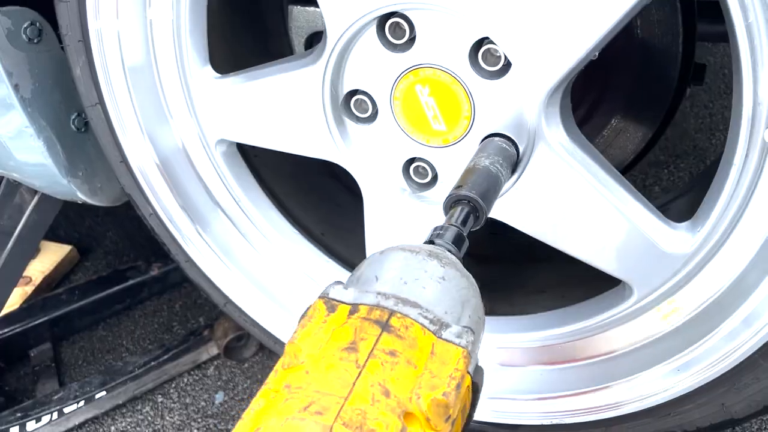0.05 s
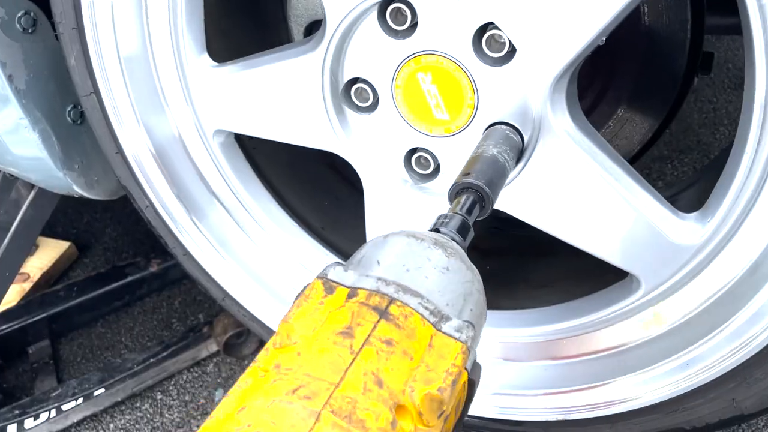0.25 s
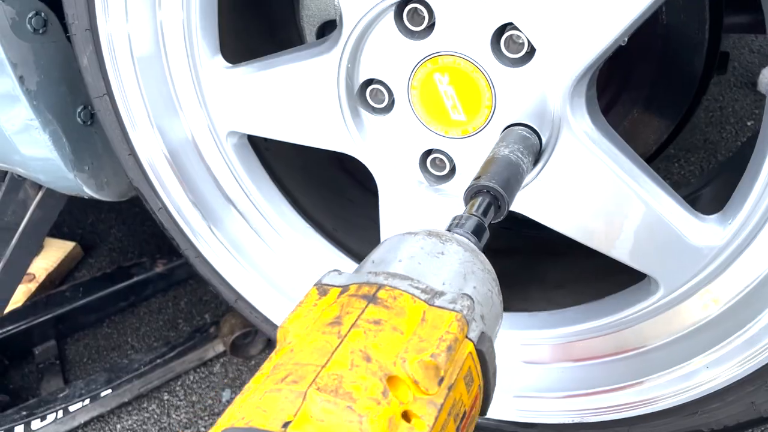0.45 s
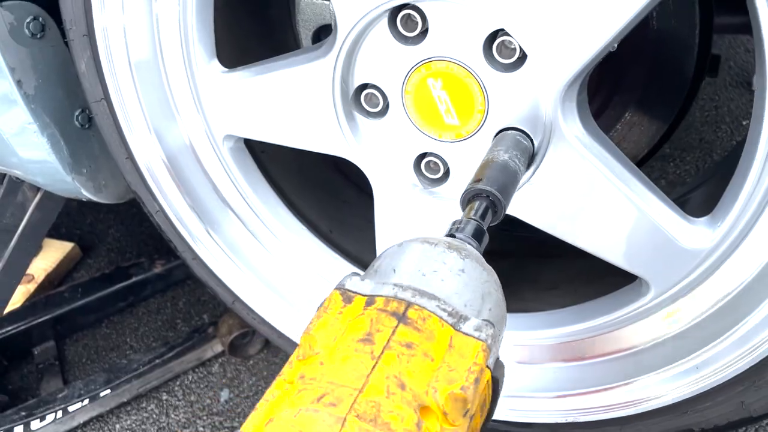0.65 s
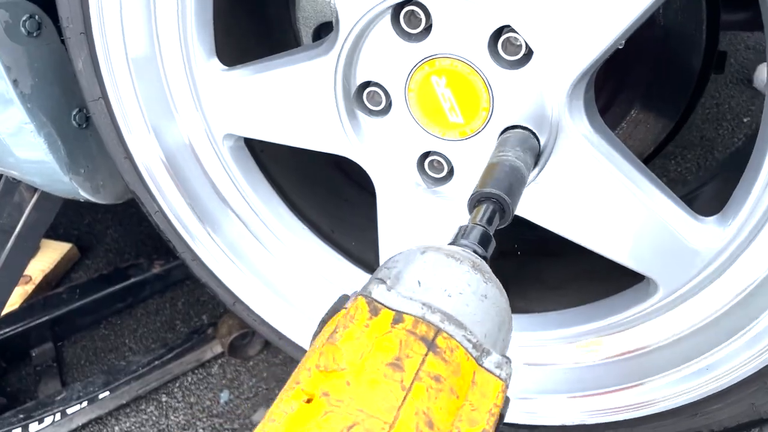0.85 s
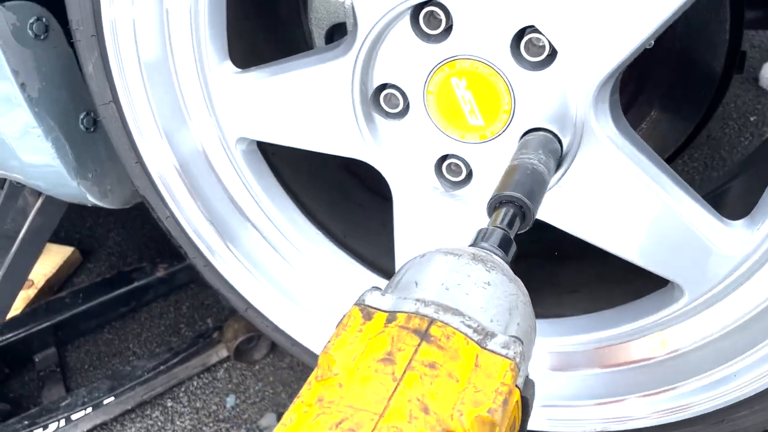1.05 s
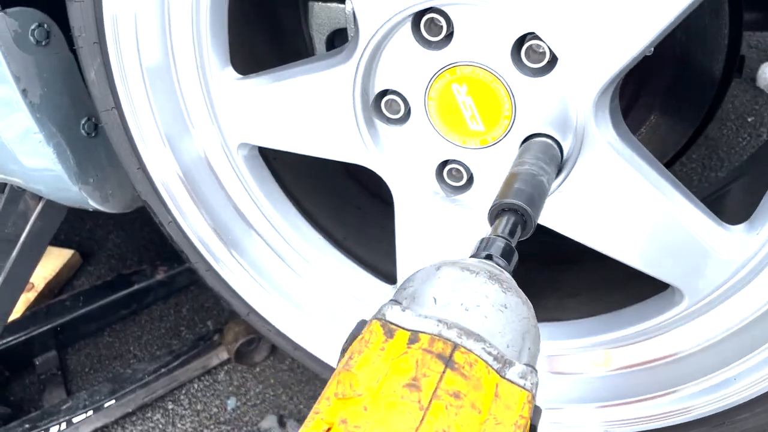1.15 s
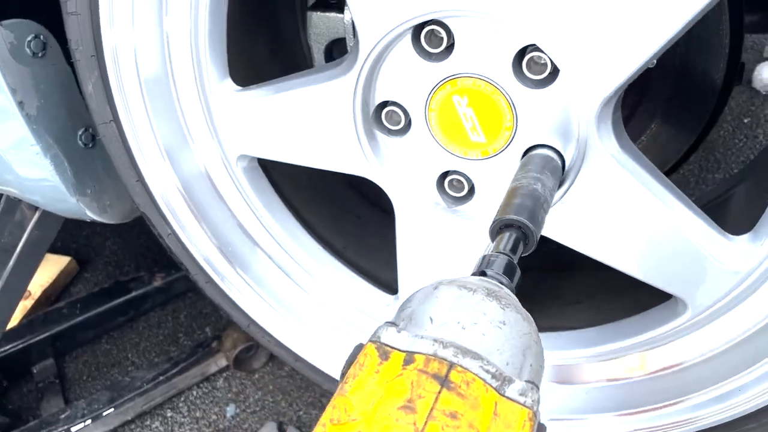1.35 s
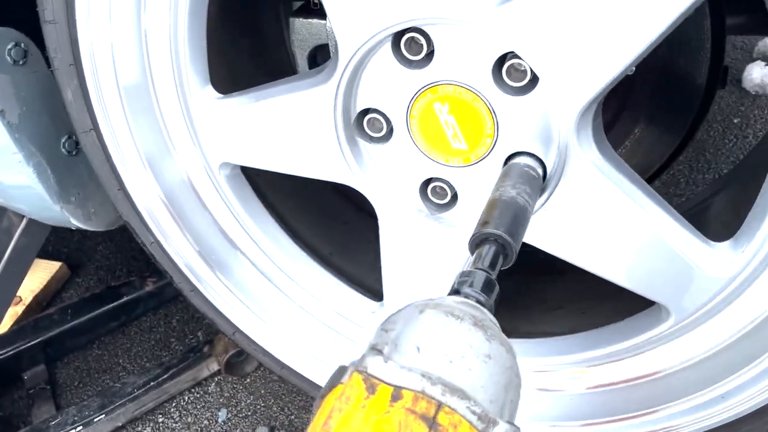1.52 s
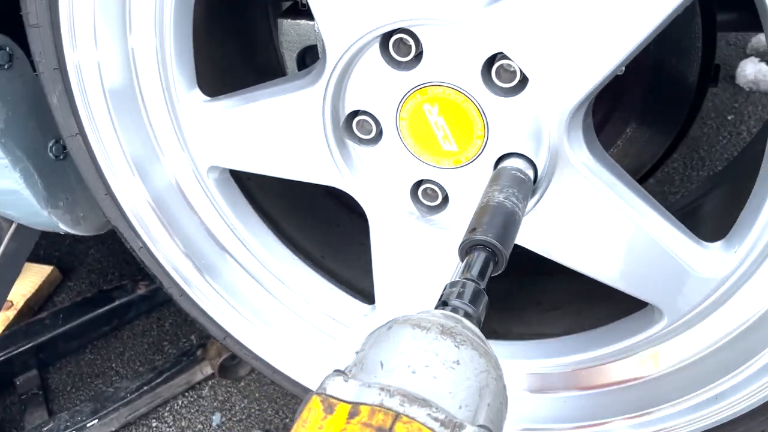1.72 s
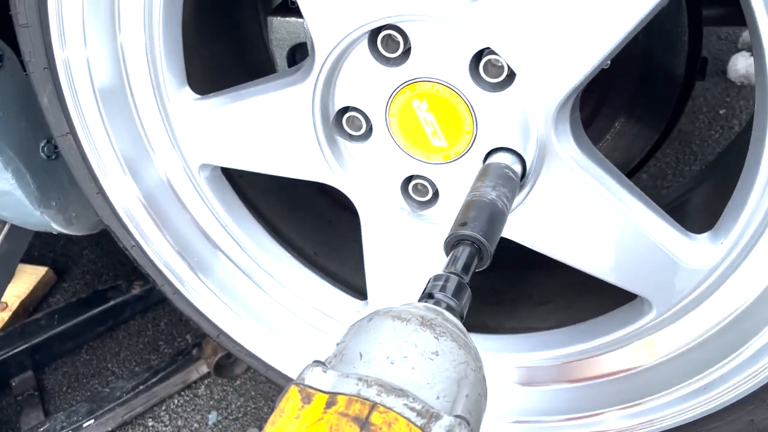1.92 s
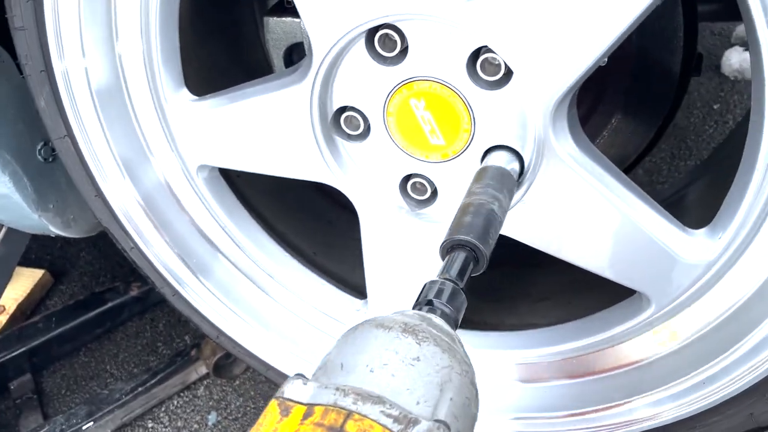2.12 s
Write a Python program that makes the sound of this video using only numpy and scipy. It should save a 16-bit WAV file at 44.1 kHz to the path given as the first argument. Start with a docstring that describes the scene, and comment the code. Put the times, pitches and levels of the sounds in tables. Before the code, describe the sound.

An impact wrench hammers a wheel nut in two bursts, then its motor whirs briefly.

```python
"""An electric impact wrench hammers a wheel nut outdoors, close to a two-port microphone. Hammer hits anvil in
two uneven bursts with light, regular taps between: each hit a crack of noise, a rattling tail and a ring of
steel. Four blows set off a deep thump that falls in pitch. Then the motor revs three times, a rising whine over
gear noise and fan hiss, and the socket clacks as it comes off the nut. Gear noise and a faint low whine linger
under soft handling knocks to the end."""
import sys
import numpy as np
from scipy import signal
from scipy.fft import rfft, irfft, next_fast_len
from scipy.io import wavfile
from scipy.ndimage import uniform_filter1d, map_coordinates

SR = 44100
rng = np.random.default_rng(int(sys.argv[2]) if len(sys.argv) > 2 else 0)


def to_wav(s):
    """Save 16-bit WAV."""
    ch = np.atleast_2d(s).T  # columns
    pcm = np.round(np.clip(ch, -1, 1) * 32767)  # PCM
    wavfile.write(sys.argv[1], SR, pcm.astype(np.int16))


N = 96005

RUMBLE_EQ = [(20, -16), (50, -1), (300, -3.5), (600, -4), (1200, -63)]  # tone of the handling rumble: (frequency [Hz], level [dB])
RUMBLE_FADER = [(0, -32), (.27, -50), (.33, -58), (.5, -51.5), (.7, -36), (1.0, -51), (1.099, -58),
                (1.351, -67), (2.03, -62.5), (2.089, -54.5), (2.18, -49)]  # its swells and dips: (time [s], level [dB])
GEAR_EQ = [(150, -10), (500, -6.5), (1100, 6), (2000, -3), (2800, 5), (4000, 1), (8000, -8), (12000, -18.5),
           (15000, -22.5)]  # tone of the gear noise: (frequency [Hz], level [dB])
# motor swells, voiced at full speed; the last is the gear noise and faint low whine that linger:
# (start [s], fade start [s], gear level [dB], whine pitch [Hz], whine over gears [dB])
MOTOR_SWELLS = [(-.3, 0.2, -34, 2400, -9.5), (0.21, 0.567, -60.5, 2580, -20),
                (0.536, 0.913, -37, 2450, -39), (0.987, 1.234, -42, 2250, -18.5),
                (1.366, 1.673, -42, 2195, -11), (1.759, 2.074, -41, 2634, -5),
                (1.991, 2.3, -44.5, 1300, -23.5)]
TOOL_KNOCKS = [(2.071, -40), (2.101, -34), (2.148, -40)]  # soft knocks of the handled tool: (time [s], level [dB])
THUMPS = [(0.707, -8.5, 0.96, 0.00058), (0.7243, -11.5, -0.83, 0.0079), (.8236, -11, 0.71, 0.0004),
          (0.8552, -13.5, -0.71, 0.00168)]  # deep falling thumps: (time [s], level [dB], signed gain [ratio], attack [s])
# hammer and socket hits: (time [s], level [dB], socket ring [dB], treble tilt [dB/octave], contact [s])
HITS = [(0.0023, -5.5, -23.5, -4, 0.0027), (0.02, -4, -2, -2.5, 0.0006), (0.048, -5.5, -19.5, -2.5, 0.0026),
        (0.0647, -12, 1, 0.5, 0.00061), (0.0746, -4, 11, -2.5, 0.00065), (0.0859, -3, 0, -2, 0.00059),
        (0.1008, -9, 6, 0, 0.00044), (0.1149, -13.5, -6, -4, 0.0049), (0.1249, -5, -15.5, -2, 0.0042),
        (0.1557, -6.5, 10, -2, 0.00034), (0.1662, -8.5, -4, -1, 0.0033), (0.1846, -18, 8, 2, 0.0005),
        (0.2127, -7, -9, 0, 0.0013), (0.2287, -12.5, -5, -1.5, 0.00074), (0.241, -14.5, 9, -5, 0.00084),
        (0.2472, -6.5, 7.5, -0.5, 0.0012), (0.261, -16.5, -12, -2, 0.00047),
        (0.5691, -17.5, -7, -4.5, 0.0041), (0.6042, -4.5, 4.5, -4, 0.00039), (0.6192, -6.5, 2, -5, 0.0005),
        (0.6236, -4.5, -0.5, 0, 0.00044), (0.6345, 0.5, -3.5, -3, 0.00035),
        (0.6516, -10.5, 1.5, -9, 0.00057), (0.663, -4, 8, 0.5, 0.00071), (0.674, -3, -1, -2.5, 0.0018),
        (0.6955, -4, 1, -2, 0.0007), (0.7044, 0, -2.5, -1, 0.00075), (0.7264, -9.5, 5, -1.5, 0.00094),
        (0.7343, -2, -14.5, -2, 0.00029), (0.7529, -12.5, 1.5, -3.5, 0.0008),
        (0.762, -1.5, -6.5, -3, 0.0005), (0.783, -8.5, 3.5, -3, 0.00037),
        (0.7903, -5.5, 6.5, -2.5, 0.00074), (0.8203, -2, -14.5, -0.5, 0.00048),
        (0.8521, -2, -34, -1, 0.00051), (0.8898, -19.5, 6, -3, 0.00074), (0.8981, -6.5, 7, 4, 0.00058),
        (0.9069, -6.5, 5.5, 0, 0.00075), (0.954, -21, 11.5, -4, 0.00041), (0.972, -9, -10.5, -2, 0.0017),
        (0.9874, -9.5, -16, -2, 0.00033), (1.0255, -16.5, -1.5, -2.5, 0.00056),
        (1.6452, -13, -5, -3.5, 0.00059), (1.6573, -7.5, 14, -0.5, 0.002), (1.669, -9, -9, -3, 0.00077),
        (1.71, -13.5, 4, 1.5, 0.00046), (1.739, -31, -14, -4, 0.00054), (2.096, -31, 10, -1, 0.002),
        (2.1142, -20.5, -4.5, -4, 0.00042), (2.1433, -30, 7, -3.5, 0.00057)]
LIGHT_TAPS = [(0.28, -32), (0.3033, -32.5), (0.326, -32.5), (0.3501, -29), (0.3739, -28), (0.4011, -23),
              (0.4264, -23.5), (0.4533, -20), (0.4797, -17), (0.5056, -17), (0.5311, -18)]  # the free-running hammer: (time [s], level [dB])
SOCKET_CHATTER = [(0.577, 0.605, -22.5), (0.609, 0.664, -19)]  # socket chattering on the nut: (start [s], end [s], mean level [dB])
CRACK_EQ = [(60, -41), (200, -13), (700, -9), (1500, -4), (2700, 0.5), (4900, 0), (6500, -0.5), (10000, 1),
            (13000, -6.5), (15500, -9.5)]  # tone of a steel contact: (frequency [Hz], level [dB])
# ringing modes of wheel steel, socket and anvil: (frequency [Hz], level [dB], 60 dB decay [s])
STEEL_MODES = [(1119, -18, 0.064), (1470, -17, 0.058), (3115, -16.5, 0.034), (5710, -1.5, 0.011)]
SOCKET_MODES = [(2526, -2.5, 0.013), (2687, 1, 0.019)]
ANVIL_MODES = [(3810, 1.5, 0.013), (4280, -2, 0.0084)]
PORT_LIKENESS = [(300, 0.99), (700, 0.79), (1200, 0.97), (2800, 1), (3300, 0.25), (3900, 0.71),
                 (4900, 0.42), (5700, 1), (8000, 0.98), (13000, 1)]  # how alike the two ports sound: (frequency [Hz], likeness [0-1])
PORT_PHASE = [(0, 0.5), (850, -1.5), (1700, 0.5), (3000, 0.5), (3400, 1), (4200, -0.06), (4700, 3),
              (5300, 0.57), (9700, 3), (13000, 5), (14200, -14.5), (17000, 11.5)]  # phase between the ports: (frequency [Hz], left lead [rad])
PORT_BALANCE = [(200, 1), (700, 3.5), (1200, -1), (2900, -1.5), (3900, -0.5), (6000, 0)]  # pan between the ports: (frequency [Hz], left over right [dB])

SPIN_UP_S, COAST_DB_PER_S, FAN_OVER_WHINE_DB = 0.11, 255.5, 3.5
WHINE_WAVER, WHINE_FUZZ, WHINE_FLUTTER_DB = 0.009, 0.7, 3.5
OVERTONE_RATIO, OVERTONE_DB = 2.25, -3
KNOCK_HZ, KNOCK_T60_S = 259, 0.049  # the pitch falls through KNOCK_HZ early in the decay
GLIDE_SCALE_S, GLIDE_GROWTH, SETTLE_HZ, THUMP_T60_S = 0.0008, 1.85, 15, 0.23
LINGER_HZ, LINGER_DB, LINGER_T60_S = 54.7, -21.5, 0.47
TAIL_CUTOFF_HZ, TAIL_DB, TAIL_T60_S, RING_DB = 6300, -15, 0.12, -8.5
LOOSE_S, LOOSE_HZ = 1.6, 2310  # once loose, the socket's lower mode drops
CHATTER_PER_S, CHATTER_SPREAD_DB = 260, 2.5


def amp(db):
    """Decibels to gain."""
    return 10 ** (np.asarray(db) / 20)


def unit(x):
    """Normalize to an rms of 1."""
    return x / np.sqrt(np.mean(x ** 2) + 1e-20)


def curve(points, hz):
    """Read a curve of (frequency [Hz], value) points on a log axis."""
    f, v = np.transpose(points)
    return np.interp(np.log(hz + 1), np.log(f + 1), v)


def wobble(rate):
    """A smooth random modulator, rate points a second."""
    return map_coordinates(rng.standard_normal(int(N * rate / SR) + 4), [np.arange(N) * rate / SR])


def filtered(x, response):
    """EQ x with a complex response of frequency."""
    size = next_fast_len(x.shape[-1] + 4096)
    return irfft(rfft(x, size) * response(np.fft.rfftfreq(size, 1 / SR)), size)[..., :x.shape[-1]]


def patchy_noise(eq, patchy_db=2.8):
    """Mid and side noise, flickering in shared patches of time and frequency."""
    bins = signal.stft(rng.standard_normal((2, N)), nperseg=512)[2]
    patches = uniform_filter1d(rng.standard_normal(bins.shape[1:]), size=4, axis=0)
    patches = uniform_filter1d(patches, size=5, axis=1)
    pair = signal.istft(bins * amp(patchy_db * unit(patches)), nperseg=512)[1][:, :N]
    return unit(filtered(pair, lambda hz: amp(curve(eq, hz))))


def ports(pair):
    """Spread mid and side over the two ports, with width, phase and pan set by frequency."""
    def width(hz):
        angle = np.arccos(np.clip(curve(PORT_LIKENESS, hz), 0, 1)) / 2
        return np.array([np.cos(angle), np.sin(angle)])

    def pan(hz):
        lead = np.interp(hz, *np.transpose(PORT_PHASE))
        left = amp(curve(PORT_BALANCE, hz) / 2) * np.exp(.5j * lead)
        return np.array([left, 1 / left])

    mid, side = filtered(pair, width)
    return filtered(np.array([mid + side, mid - side]), pan)


def handling_rumble():
    """The handled tool lays down a low bed that swells and dips."""
    fader_db = np.interp(np.arange(N) / SR, *np.transpose(RUMBLE_FADER))
    return amp(fader_db) * patchy_noise(RUMBLE_EQ, patchy_db=3.5)


def handling_knocks():
    """The tool knocks softly in the hand: short sines diving in pitch."""
    out, t = np.zeros(N + SR), np.arange(SR // 2) / SR
    dive = np.sin(2 * np.pi * KNOCK_HZ * np.sqrt(t * KNOCK_T60_S / 2))
    for at, db in TOOL_KNOCKS:
        out[round(at * SR):][:len(t)] += amp(db - 60 * t / KNOCK_T60_S) * dive
    return out[:N]


def motor():
    """Gear noise, fan hiss and a fuzzy whine climb with the motor's speed, then die away."""
    t = np.arange(N) / SR
    grain = amp(1.5 * wobble(250) + wobble(40.23))
    gears = unit(grain * patchy_noise(GEAR_EQ))
    hiss = unit(np.diff(patchy_noise(GEAR_EQ), prepend=0))
    gear_gain, fan_gain, whine = amp(-80.5), 0, 0  # a faint floor stays between swells
    for start, fade_start, db, top_hz, whine_db in MOTOR_SWELLS:
        speed = 1 - np.exp(-np.maximum(t - start, 0) / SPIN_UP_S)
        gain = amp(db - COAST_DB_PER_S * np.maximum(t - fade_start, 0)) * speed ** 1.29
        phase = 2 * np.pi * np.cumsum(top_hz * speed * (1 + WHINE_WAVER * wobble(30))) / SR
        for ratio, partial_db in (1, 0), (OVERTONE_RATIO, OVERTONE_DB):
            fuzz = speed + WHINE_FUZZ * wobble(90)
            flutter_db = WHINE_FLUTTER_DB * wobble(19)
            whine += gain * fuzz * amp(whine_db + partial_db + flutter_db) * np.sin(ratio * phase)
        gear_gain += gain
        fan_gain += amp(FAN_OVER_WHINE_DB + whine_db) * gain * speed ** 2
    return gear_gain * gears + fan_gain * hiss + whine * [[1], [0]]  # whine in the mid only


def microphone_thumps():
    """Each big blow sets off a deep thump whose swings grow ever slower: a pitch drop with a lingering low
    ring."""
    out, t = np.zeros(N + SR), np.arange(SR // 2) / SR
    slowing_phase = np.pi * np.log(1 + t / GLIDE_SCALE_S) / np.log(GLIDE_GROWTH)
    swing = np.sin(slowing_phase + 2 * np.pi * SETTLE_HZ * t + 2.48)
    linger = amp(LINGER_DB - 60 * t / LINGER_T60_S) * np.sin(2 * np.pi * LINGER_HZ * t)
    for at, db, push, attack_s in THUMPS:
        envelope = (1 - np.exp(-(t / attack_s) ** 2)) * amp(-60 * t / THUMP_T60_S)
        out[round(at * SR):][:len(t)] += amp(db) * (push * envelope * swing + linger)
    return out[:N]


def steel_ring(t, loose, socket_db, anvil_db):
    """Wheel, socket and anvil ring as damped sines, a little different on every hit."""
    socket = [(LOOSE_HZ, *SOCKET_MODES[0][1:]), SOCKET_MODES[1]] if loose else SOCKET_MODES
    ring = 0
    for modes, trim_db in (STEEL_MODES, 0), (socket, socket_db), (ANVIL_MODES, anvil_db):
        for hz, db, t60 in modes:
            accent_db, detune, phase = rng.normal(0, [2.2, 0.036, 0.5])
            envelope = amp(db + trim_db + accent_db - 60 * t / t60)
            ring += envelope * np.sin(2 * np.pi * hz * (1 + detune) * t + phase)
    return ring


def strike(at, db, socket_db, tilt_db, contact_s, t60=0.019, attack_s=0.0012):
    """Steel on steel: a crack held through the contact, a duller rattling tail and a ring."""
    def tone(hz):
        treble_db = np.clip(tilt_db, -5, 4) * np.log2(np.maximum(hz, 1200) / 3000)
        bright = amp(curve(CRACK_EQ, hz) + treble_db)
        dull = bright / (1 + (hz / TAIL_CUTOFF_HZ) ** 2)
        return np.array([[bright], [dull]])

    t = np.arange(SR // 10) / SR
    crack, tail = unit(filtered(rng.standard_normal((2, len(t))), tone))
    crack *= amp(-60 * np.maximum(t - contact_s, 0) / t60)
    tail *= amp(TAIL_DB - 60 * t / TAIL_T60_S)
    hit = .5 * (crack + tail)
    # a blow that misses the socket's ring feeds the anvil's instead
    anvil_db = -0.2 * socket_db if contact_s > 0 else 0
    hit[0] += amp(RING_DB) * steel_ring(t, at >= LOOSE_S, socket_db, anvil_db)  # mid only
    attack = 1 - np.exp(-(t / attack_s) ** 2)
    return amp(db) * attack * hit


def hammer():
    """The hammer pounds the anvil or taps as it runs free; the socket chatters on the nut."""
    chatter = [(slot + rng.random() / CHATTER_PER_S, rng.normal(db, CHATTER_SPREAD_DB))
               for start, end, db in SOCKET_CHATTER for slot in np.arange(start, end, 1 / CHATTER_PER_S)]
    cues = [(at, strike(at, *voicing)) for at, *voicing in HITS]
    cues += [(at, strike(at, db, socket_db=-25, tilt_db=-2.5, contact_s=0, t60=0.016, attack_s=0.00072))
             for at, db in LIGHT_TAPS]
    cues += [(at, strike(at, db, socket_db=0, tilt_db=-5, contact_s=0)) for at, db in chatter]
    out = np.zeros((2, N + SR))
    for at, hit in cues:
        out[:, round(at * SR):][:, :hit.shape[1]] += hit
    return out[:, :N]


def scene():
    """The wrench spread across the ports, thumps and knocks dead centre."""
    return ports(hammer() + motor() + handling_rumble()) + microphone_thumps() + handling_knocks()


def record(dry, ceiling=0.97, low_cut_hz=42, shelf_hz=15700, shelf_db=-22.5, top_hz=16900):
    """Soft clipping, then a bass cut, a high shelf down and a brick-wall top."""
    def eq(hz):
        shelf = amp(shelf_db * np.clip((hz - shelf_hz) / 400, 0, 1))
        return shelf * (hz < top_hz) / (1 + (low_cut_hz / (hz + 1)) ** 4)

    clipped = dry / (1 + np.abs(dry / ceiling) ** 4) ** .25
    return filtered(clipped, eq)


dry = scene()
out = record(dry)
to_wav(out)
```